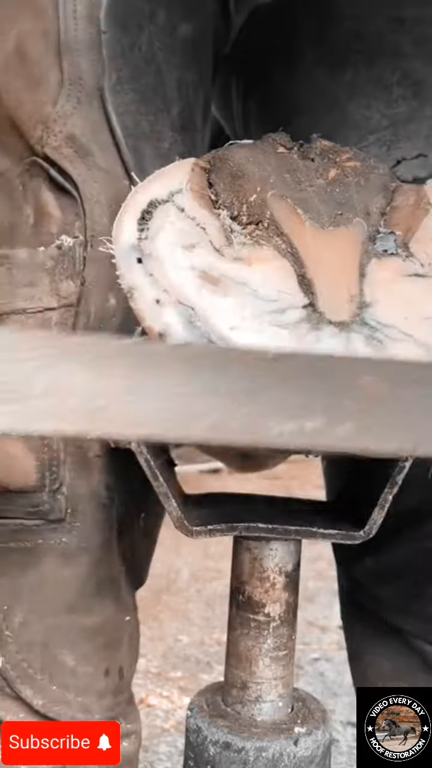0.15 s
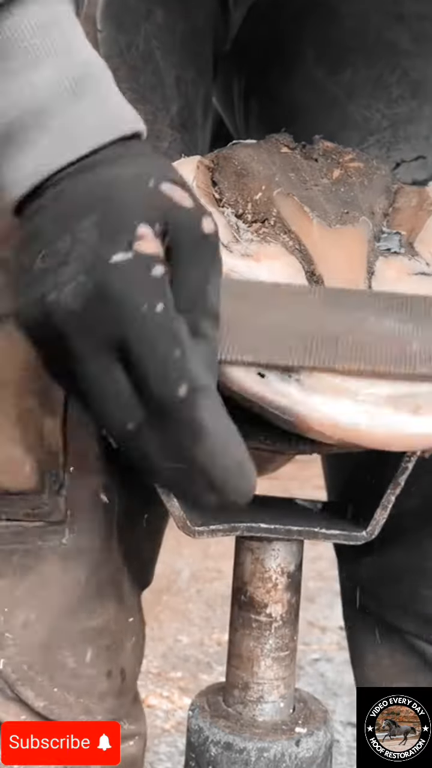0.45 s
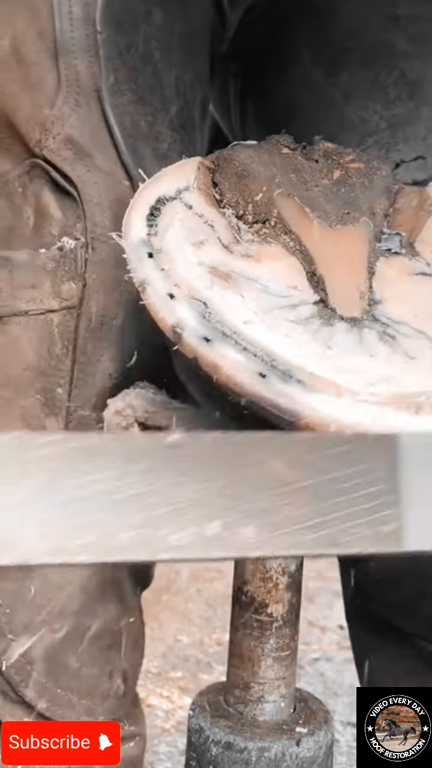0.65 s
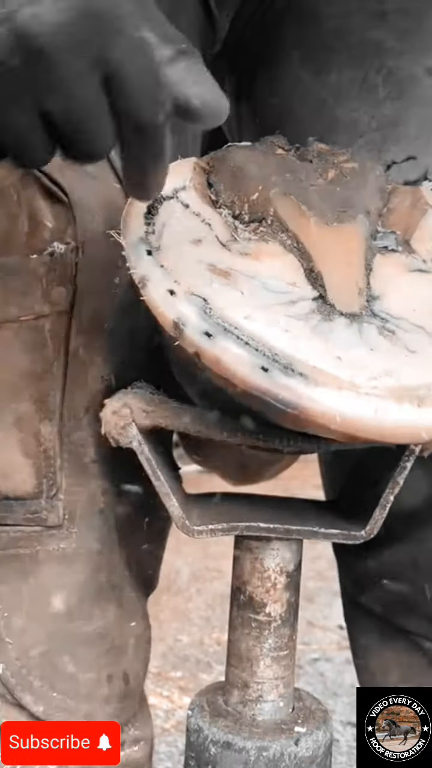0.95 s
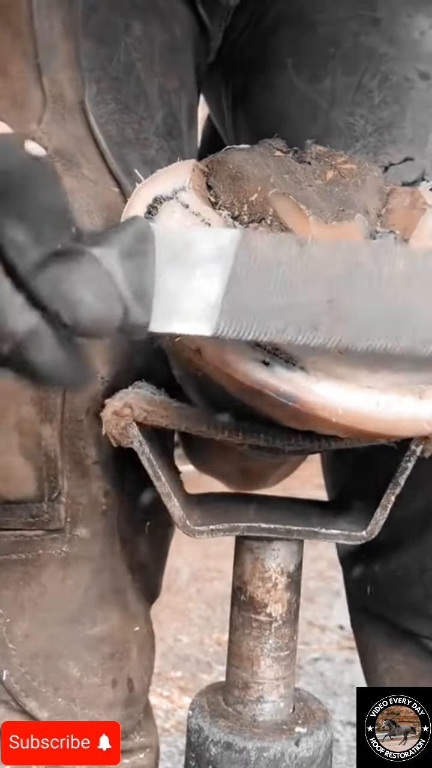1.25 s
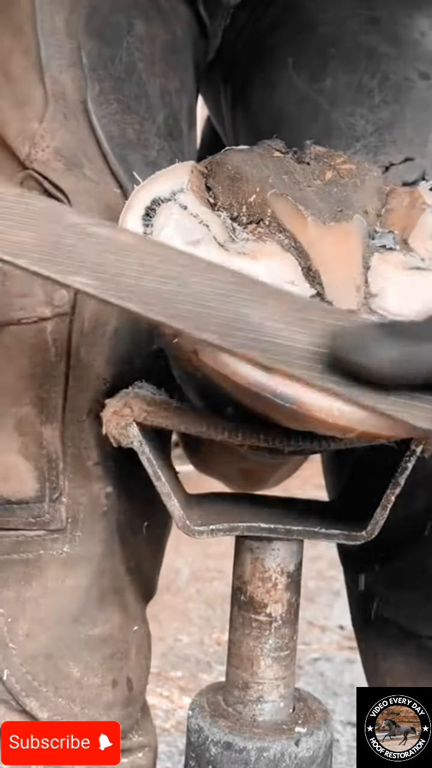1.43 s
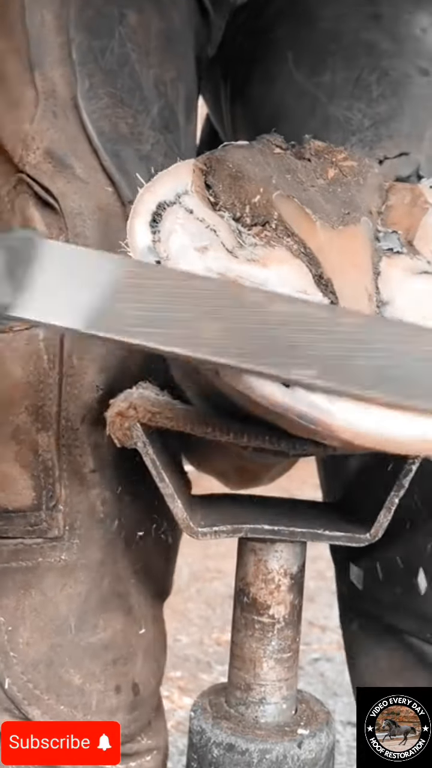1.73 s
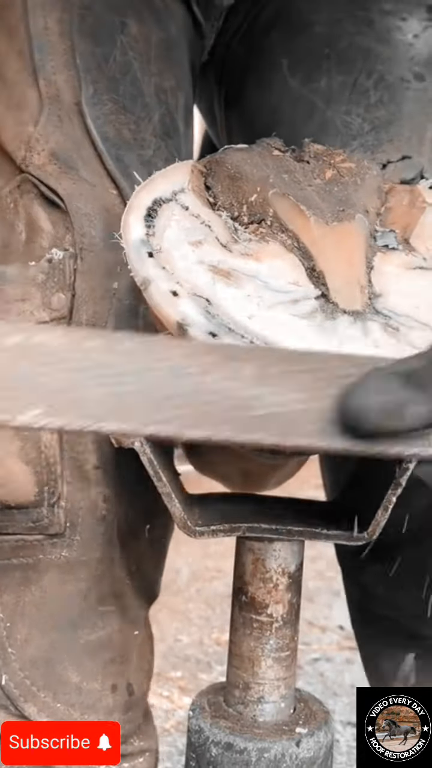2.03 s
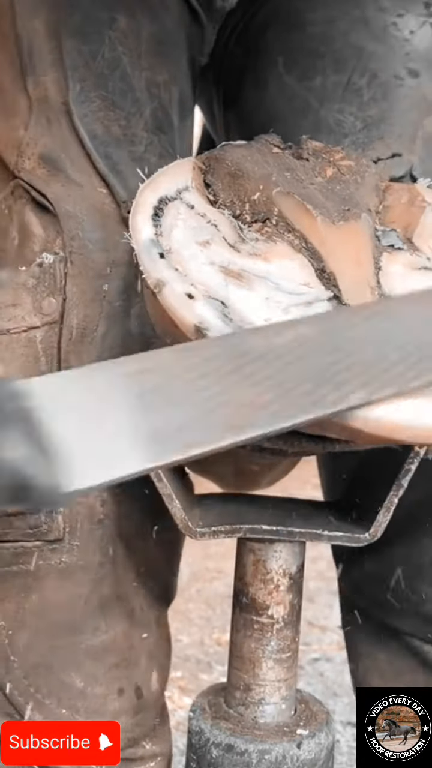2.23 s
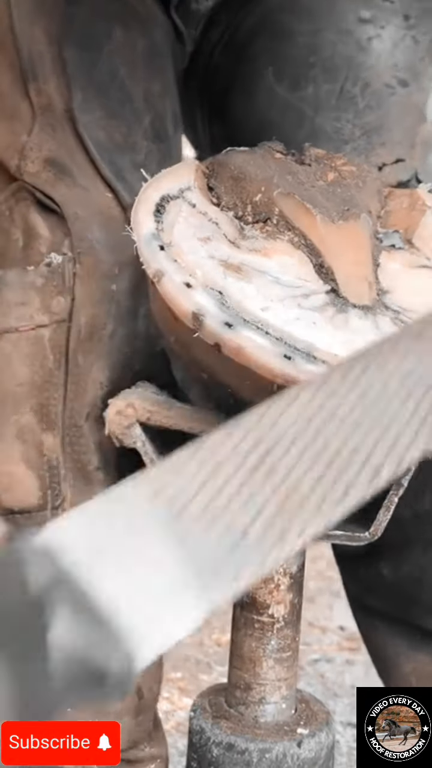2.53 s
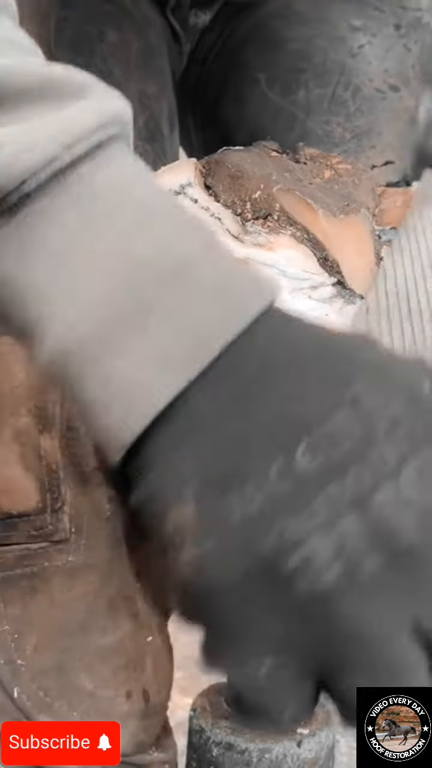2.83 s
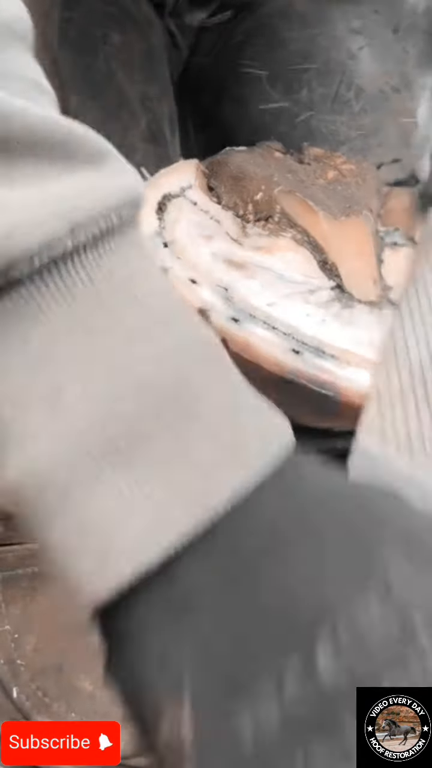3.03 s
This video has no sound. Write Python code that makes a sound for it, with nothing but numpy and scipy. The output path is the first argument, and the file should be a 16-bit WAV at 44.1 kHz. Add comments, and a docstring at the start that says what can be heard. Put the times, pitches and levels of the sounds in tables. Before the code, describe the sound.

Close, rough rasping on a horse's hoof, with small chip snaps over a low hum.

```python
"""A farrier rasps a horse's hoof on a stand, close to the microphone, over a low rush and hum.
Five strokes open: rows of steel teeth tear off horn and the rasp sings faintly. Near one second the
rasp rests and a few chips snap. Steady strokes follow, the strongest just after two seconds, and
short light ones finish. Throughout, hoof and stand bump dully and a rumble and rustle come and go."""
import sys
import numpy as np
from scipy import signal
from scipy.fft import rfft, irfft, next_fast_len
from scipy.io import wavfile
from scipy.ndimage import uniform_filter1d, map_coordinates

SR = 44100
rng = np.random.default_rng(int(sys.argv[2]) if len(sys.argv) > 2 else 0)


def wrap_up_sound(samples):
    """Save the sound to the file named by the first command line argument, as 16-bit audio."""
    columns = np.atleast_2d(samples).T
    # keep every value between -1 and 1, then stretch to whole-number steps
    tamed = np.clip(columns, -1, 1)
    steps = np.round(tamed * 32767).astype(np.int16)
    wavfile.write(sys.argv[1], SR, steps)


N = 140238

# Colour of the low rush of the place. Each row: frequency in Hz, level in dB.
RUSH_COLOUR = [(20, -35), (60, -8.5), (100, -9), (170, 3), (260, -9), (350, -10.5), (430, -20.5),
               (560, -15.5), (750, -30), (1300, -23), (2200, -35.5), (5000, -39.5), (9000, -49),
               (15000, -64)]
# Width of the background. Each row: frequency in Hz, left-right likeness from -1 to 1.
BACKGROUND_ALIKE = [(60, 0.86), (150, 0.94), (280, 0.81), (500, -0.21), (1000, -0.25), (4000, .5)]
# Where the background sits. Each row: frequency in Hz, left over right in dB.
BACKGROUND_PAN = [(60, 2), (120, -2.5), (250, -3.5), (500, -4), (1000, -1), (4000, -1.5)]
# Course of the deep rumble and of the dull rustle. Each row: time in seconds, level in dB.
RUMBLE_LEVELS = [(0.0, -55), (0.03, -48), (0.11, -46), (0.17, -36), (0.24, -56), (0.57, -61), (1.55, -35.5),
                 (1.59, -32.5), (1.66, -40), (2.43, -68), (3.09, -47.5), (3.18, -38.5)]
RUSTLE_LEVELS = [(0.0, -55), (0.11, -41.5), (0.17, -61.5), (0.36, -48), (0.41, -57.5), (0.59, -43.5),
                 (0.7, -55), (0.72, -55), (1.24, -53), (1.27, -43.5), (1.53, -50), (1.55, -65),
                 (1.58, -47.5), (1.74, -50.5), (1.78, -42.5), (1.8, -61), (1.87, -51.5), (3.18, -51.5)]
# Their colours. Each row: frequency in Hz, level in dB.
RUMBLE_COLOUR = [(15, -32), (30, -13), (50, 0.5), (80, -1.5), (130, 2), (300, -52), (900, -100)]
RUSTLE_COLOUR = [(120, -8), (220, 2.5), (330, -0.5), (450, -6.5), (600, -11.5), (750, -15.5), (1500, -49)]
# Bumps at the stand. Each row: crest in seconds, level in dB, pitch in Hz, half length in seconds.
BUMPS = [(0.177, -34, 63.7, 0.016), (.17, -36.5, 165.3, 0.035), (.595, -30, 168, 0.013),
         (1.082, -39.5, 66, 0.041), (1.28, -30, 173.5, .012), (1.45, -37.5, 57, 0.023),
         (1.594, -25, 83.4, .014), (1.79, -37.5, 182, 0.017), (2.057, -40, 130, 0.014),
         (2.455, -33, 154, 0.017), (2.99, -39.5, 167.5, 0.029), (3.1, -48.5, 172, 0.027)]
# Snapping chips and catching teeth. Each row: start in seconds, level in dB, centre in Hz.
SNAPS = [(0.121, -32.5, 4140), (.902, -44, 3300), (.908, -47, 3000), (0.915, -42.5, 3300),
         (.924, -52, 3200), (1.004, -64, 2500), (1.204, -52, 2200), (1.213, -44, 2260), (1.255, -40, 1150),
         (1.268, -53, 1100), (2.095, -50, 2280), (2.396, -39, 4070), (2.404, -40, 3980), (2.435, -38, 6000),
         (2.44, -31, 5040), (2.519, -41.5, 3530), (3.061, -38.5, 3640), (3.069, -50, 3400),
         (3.083, -40, 3200), (3.155, -49, 2970)]
# Colour of tearing horn. Each row: frequency in Hz, level in dB.
HORN_COLOUR = [(150, -14), (450, 2), (800, -4), (1200, 1), (1800, 5.5), (2400, 7.5), (3000, 9), (3600, 6),
               (4400, 6.5), (5200, 7.5), (6500, 1.5), (8200, 3), (9100, 7), (10300, -8), (11400, -10),
               (12400, 1.5), (13600, -5), (15000, -28), (16000, 8)]
# Resonances of hoof and blade. Each row: centre in Hz, width in Hz, gain in dB.
HOOF_MODES = [(2270, 26, 6.5), (2500, 43, 9.5), (3630, 130, 10), (3940, 42, 9), (4210, 48, 3),
              (4600, 25, 1), (4978, 126, 1)]
# Thin tones of the steel. Each row: pitch in Hz, level in dB.
STEEL_TONES = [(9819, -18.5), (11197, -24.5), (13954, -33)]
# Width of the rasping. Each row: frequency in Hz, left-right likeness from -1 to 1.
RASP_ALIKE = [(500, 0.29), (1000, 0.39), (2200, 0.82), (4000, 0.76), (7500, 0.66), (12000, 0.37)]
# Where the rasping sits. Each row: frequency in Hz, left over right in dB.
RASP_PAN = [(600, 3), (1100, -2), (2200, 5.5), (4000, -3.5), (7500, 3.5), (12000, 1.7)]
# Rasp strokes. Each row: start, hardest push and end in seconds; level, swell, fade, low-mid gain and
# treble gain in dB; contact resonance in Hz; its boost, steel ring and left over right in dB.
STROKES = [ (.008, 0.096, 0.11, -36, 24, -1.5, 4.5, -1, 3800, -8, 3, -2),
           (0.126, 0.124, 0.18, -48.5, -16.5, 7, 6, 2, 4030, 0, -4, -4),
           (0.26, 0.352, .41, -48, 20.5, 16.5, 8, -2.5, 3560, 1.5, -14, -5),
           (0.437, 0.528, 0.62, -40, 19.5, 17, 4.5, 0.5, 3830, -4, 3, -4),
           (0.613, .74, 0.84, -59.5, 24, 16, -17, 3.5, 3940, -1, -16, -1),
           (1.114, 1.24, 1.242, -54.5, 16, 5, 10, 2.5, 2360, 6, -1, -2.5),
           (1.29, 1.414, 1.493, -43.5, 11.5, 7, 9, -2.5, 2200, 4.5, 5, -2),
           (1.558, 1.7, 1.769, -38.5, 17.5, -2, 8, 1.5, 2750, -1, 5, -3),
           (1.871, 1.953, 2.033, -44.5, 14.5, 5.5, 7.5, -2.5, 2320, 4.5, 2, -2),
           (2.088, 2.214, 2.293, -30, 26, -0.5, -2.5, -5, 2540, 2, 2, -3),
           (2.39, 2.465, 2.59, -38, 21, 26.5, 1, 2, 3870, 2, -11, -3.5),
           (2.63, 2.746, 2.79, -32.5, 19.5, 9, -7, -8, 3680, -2.5, -6, -3.5),
           (2.785, 2.815, 2.853, -43.5, -0.5, 4, -1, -5, 4200, 2, -13, -3),
           (2.938, 3.005, 3.05, -47, 14, 1.5, 6, -4, 4210, 6.5, -11.5, -3.5),
           (3.057, 3.063, 3.087, -45.5, 4, -5, 4, -6, 3380, 4, -1, -5),
           (3.14, 3.16, 3.19, -45, 12.5, -5.5, 8, -5, 2250, 4, 4, -1)]
# Narrow, steady dips in the overall tone. Each row: centre in Hz, half width in Hz, depth in dB.
TONE_DIPS = [(720.5, 67.7, 14.5), (5915, 260, 20)]

RUSH_DB, RUMBLE_DB, RUSTLE_DB = -47, -8, -2.5
HUM_HZ, HUM_DB = 119, -53.5
ROOM_T60_S, ROOM_DB = .2, -17
SNAP_T60_S, SNAP_HALF_OCTAVES = 0.018, 0.64
STEEL_T60_S, STEEL_WAVER_DB, STEEL_WIDTH_HZ = .09, 2.5, 14
BITE_HZ, ROW_HZ = 5970, 479.5  # single teeth and rows of teeth a second, at speed 1
BITE_SPREAD_DB, ROW_DEPTH, JUDDER_DB, DUST_DB = 4, 0.21, 0.67, -5
HOOF_DB, PATCHY_DB, CONTACT_WIDTH_HZ = -11, 2.22, 300
SWELL_SHAPE, FADE_SHAPE, RELEASE_DB_PER_S = 1.7, 1.5, 1400
SPEED_PER_DB, TREBLE_PER_DB = 0.0377, 0.14  # log speed and dB of treble gained per dB of effort
TOP_HZ = 15500


def amp(db):
    """Decibels to gain."""
    return 10 ** (np.asarray(db) / 20)


def unit(x):
    """Scale to rms 1."""
    return x / np.sqrt(np.mean(x ** 2) + 1e-20)


def along(points, hz):
    """Read (Hz, value) points on a log frequency axis."""
    f, v = np.transpose(points)
    return np.interp(np.log(hz + 1), np.log(f + 1), v)


def wobble(rate):
    """A smooth random curve, rate knots a second."""
    return map_coordinates(rng.standard_normal(int(N * rate / SR) + 4), [np.arange(N) * rate / SR])


def filtered(x, response):
    """Shape x by a gain that depends on frequency."""
    size = next_fast_len(N + SR // 4)
    return irfft(rfft(x, size) * response(np.fft.rfftfreq(size, 1 / SR)), size)[..., :N]


def pan(db):
    """Left and right gains, the left louder by db."""
    return amp(db * np.array([[.5], [-.5]]))


def stereo(pair, alike):
    """Mix two unrelated signals to a given left-right likeness; the middle has rms 1."""
    turn = lambda f: np.arccos(np.clip(along(alike, f), -1, 1)) / 2
    mid, side = filtered(pair, lambda f: np.array([np.cos(turn(f)), np.sin(turn(f))]))
    return np.array([mid + side, mid - side]) / mid.std()


def ambient_noise(colour):
    """Coloured noise with the stereo width of the background."""
    pair = filtered(rng.standard_normal((2, N)), lambda f: amp(along(colour, f)))
    return stereo(pair, BACKGROUND_ALIKE)


def background(t):
    """The place: low rush, wavering hum, deep rumble and a dull rustle as of apron and leg."""
    course = lambda levels: amp(np.interp(t, *np.transpose(levels)))
    rush = amp(RUSH_DB + 2 * wobble(8.06)) * ambient_noise(RUSH_COLOUR)
    hum_gain = amp(HUM_DB + 4.2 * wobble(14)) * np.sqrt(2)
    hum = hum_gain * np.sin(2 * np.pi * HUM_HZ * t + 0.85 * wobble(6.7))
    rumble = amp(RUMBLE_DB) * course(RUMBLE_LEVELS) * ambient_noise(RUMBLE_COLOUR)
    rustle = amp(RUSTLE_DB) * course(RUSTLE_LEVELS) * ambient_noise(RUSTLE_COLOUR)
    return filtered(rush + hum + rumble + rustle, lambda f: pan(along(BACKGROUND_PAN, f)))


def room(x):
    """The surroundings answer briefly, reaching the microphone 4 ms after the direct sound."""
    t = np.arange(SR // 3) / SR
    tail = rng.standard_normal((2, len(t))) * amp(-60 * t / ROOM_T60_S) * (t > .004)
    return signal.fftconvolve(x, tail / np.linalg.norm(tail[0]), axes=1)[:, :N]


def bumps(t):
    """Leg, hoof and stand swing for a few cycles in soft, low thuds."""
    thuds = np.zeros(N)
    for crest, db, hz, half_length in BUMPS:
        envelope = amp(db) * np.exp(-((t - crest) / half_length) ** 2)
        thuds += envelope * np.cos(2 * np.pi * hz * (t - crest) + rng.uniform(0, 2 * np.pi))
    return thuds * pan(-1.6)


def snaps(t):
    """Chips break and teeth catch: short dry cracks of horn, each a dying band of noise."""
    cracks = np.zeros((2, N))
    length = 4096
    for start, db, hz in SNAPS:
        edges = np.clip(hz * 2.0 ** (SNAP_HALF_OCTAVES * np.array([-1, 1])), 100, SR / 3)
        band = signal.butter(2, edges, "bandpass", fs=SR, output="sos")
        burst = rng.standard_normal((2, length)) * amp(db - 60 * t[:length] / SNAP_T60_S)
        mid, side = signal.sosfilt(band, burst) * np.sqrt(SR / 2 / (edges[1] - edges[0]))
        at = round(start * SR)
        cracks[:, at:at + length] += np.array([mid + 0.1 * side, mid - 0.28 * side])[:, :N - at]
    return cracks * pan(-1.1)


def steel_ring(t, drive):
    """Driven by the strokes, the blade sings in thin, wavering tones that ring on briefly."""
    decay = amp(-60 / (STEEL_T60_S * SR))
    envelope = signal.lfilter([1 - decay], [1, -decay], drive)
    tones = np.zeros(N)
    for hz, db in STEEL_TONES:
        gain = amp(db + STEEL_WAVER_DB * wobble(24.8))
        tones += gain * np.sin(2 * np.pi * hz * t + .5 * wobble(STEEL_WIDTH_HZ))
    return envelope * tones


def hoof_response(f):
    """Hoof and blade answer as a set of damped resonators."""
    return sum(amp(db) * 1j * f * width / (hz * hz - f * f + 1j * f * width)
               for hz, width, db in HOOF_MODES)


def sliding_colour(x):
    """Narrow bands swell and sink as the rasp slides."""
    spectra = signal.stft(x, nperseg=512)[2]
    patches = uniform_filter1d(rng.standard_normal(spectra.shape[1:]), size=3, axis=0)  # over frequency
    patches = uniform_filter1d(patches, size=11, axis=1)  # over time
    return signal.istft(spectra * amp(PATCHY_DB * unit(patches)), nperseg=512)[1][:, :N]


def teeth(speed):
    """Tiny fractures, bunched by the passing rows of teeth, sound through horn and blade."""
    rows_passed = np.cumsum(ROW_HZ * speed * np.exp(.25 * wobble(90))) / SR
    bunching = np.exp(ROW_DEPTH * np.cos(2 * np.pi * rows_passed)) * amp(JUDDER_DB * wobble(160))
    hits = rng.random(N) < BITE_HZ * speed / SR
    sizes = amp(BITE_SPREAD_DB * np.clip(rng.standard_normal(N), -2, 2))
    bites = unit(hits * sizes * rng.choice([-1, 1], (2, N)))
    dust = amp(DUST_DB) * rng.standard_normal((2, N))
    torn = filtered(bunching * (bites + dust), lambda f: amp(along(HORN_COLOUR, f)))
    ringing = amp(HOOF_DB) * unit(filtered(torn, hoof_response))
    grit = stereo(sliding_colour(unit(torn) + ringing), RASP_ALIKE)
    return filtered(grit, lambda f: pan(along(RASP_PAN, f)))


def efforts(t):
    """Gain of each stroke: it swells, fades, and drops as the rasp lifts off."""
    gains = []
    for start, hardest, end, db, swell_db, fade_db, *_ in STROKES:
        rise = np.clip((hardest - t) / max(hardest - start, .005), 0, 1) ** SWELL_SHAPE
        fall = np.clip((t - hardest) / max(end - hardest, .005), 0, 1) ** FADE_SHAPE
        lifted_s = np.maximum(start - t, 0) + np.maximum(t - end, 0)
        gains.append(amp(db - swell_db * rise - fade_db * fall - RELEASE_DB_PER_S * lifted_s))
    return np.array(gains)


def rasp(t):
    """The rasp, close up: effort sets loudness, tooth rate and brightness; each stroke has its colour."""
    low_mid = lambda f: 1 / (1 + (f / 1800) ** 4)
    treble = lambda f: 1 - 1 / (1 + (f / 6200) ** 6)
    gains = efforts(t)
    effort_db = np.maximum(20 * np.log10(gains.sum(0) + 1e-9) + 36, -25)
    grit = teeth(speed=np.exp(SPEED_PER_DB * effort_db))
    grit += filtered(grit, treble) * (amp(TREBLE_PER_DB * effort_db) - 1)
    scrape, drive = np.zeros((2, N)), np.zeros(N)
    for gain, (*_, mid_db, treble_db, contact_hz, boost_db, ring_db, pan_db) in zip(gains, STROKES):
        contact = lambda f: 1 / (1 + ((f - contact_hz) / CONTACT_WIDTH_HZ) ** 2)
        colour = lambda f: amp(mid_db * low_mid(f) + treble_db * treble(f) + boost_db * contact(f))
        scrape += gain * filtered(grit, colour) * pan(pan_db)
        drive += gain * amp(ring_db)
    return scrape + steel_ring(t, drive)


def scene():
    """Rasp and chips close to the microphone with little room sound, over bumps and background."""
    t = np.arange(N) / SR
    work = rasp(t) + snaps(t)
    return work + amp(ROOM_DB) * room(work) + bumps(t) + background(t)


def record(dry):
    """Two narrow, steady dips in the overall tone, near 720 Hz and 5.9 kHz, and a steep top cut."""
    dips = lambda f: amp(-sum(db * np.exp(-((f - hz) / width) ** 2) for hz, width, db in TONE_DIPS))
    top_cut = lambda f: 1 / (1 + (f / TOP_HZ) ** 200)
    return filtered(dry, lambda f: dips(f) * top_cut(f))


dry = scene()
out = record(dry)
wrap_up_sound(out)
```